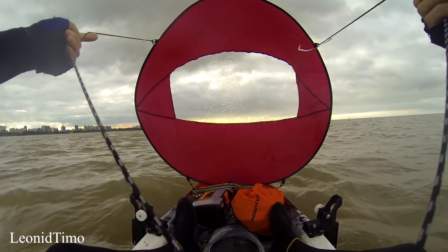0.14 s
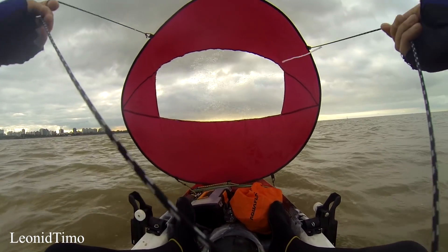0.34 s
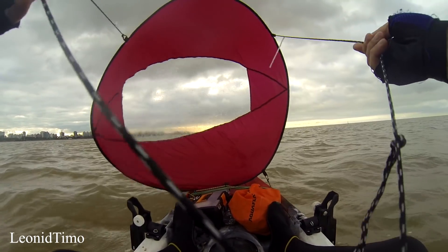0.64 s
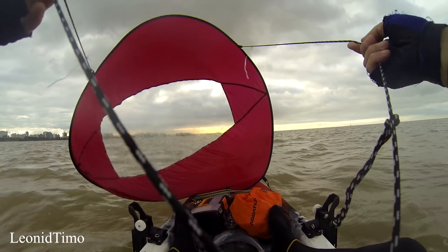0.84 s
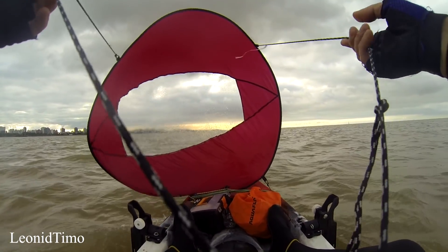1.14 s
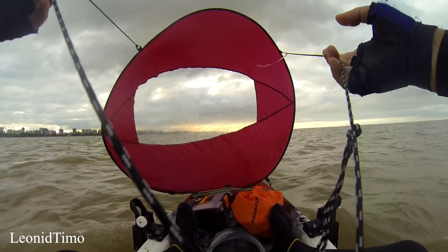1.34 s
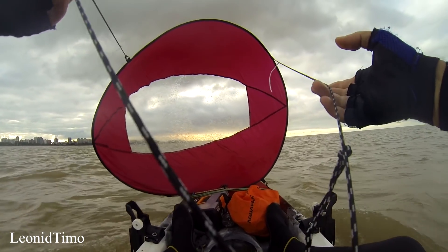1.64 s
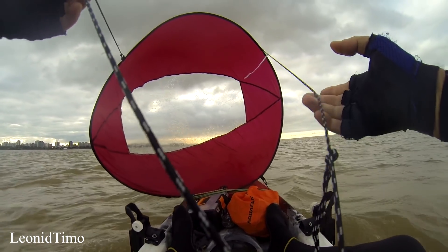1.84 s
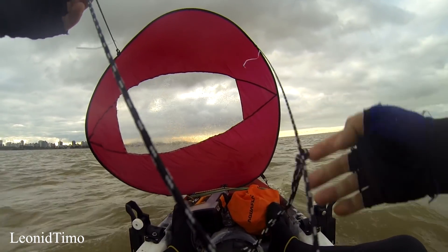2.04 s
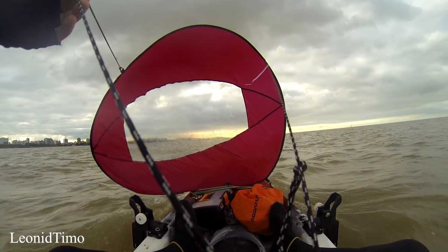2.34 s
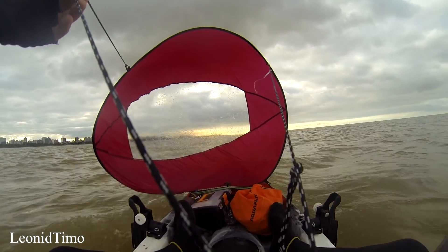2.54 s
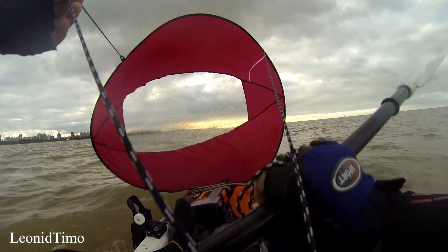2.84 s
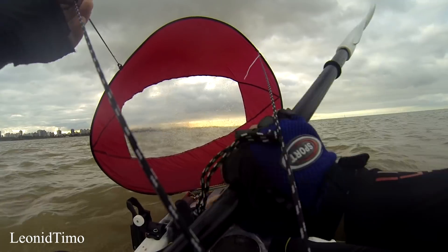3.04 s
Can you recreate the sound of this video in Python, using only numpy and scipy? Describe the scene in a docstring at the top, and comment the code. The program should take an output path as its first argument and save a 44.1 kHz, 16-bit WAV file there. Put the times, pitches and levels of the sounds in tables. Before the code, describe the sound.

Water washes and gurgles along a small boat's hull, with low wind rumble and paddle knocks

```python
"""Wind rumbles on a cased microphone on board a small sailing kayak running through choppy water.
Waves wash along the hull: flickering noise bands, with swarms of short sines as froth and spray.
Close by, single bubbles, drops and ticks sound low to high, and short noise bursts splash the deck.
The paddle knocks the deck: soft pushes set the modes of the hull ringing."""
import sys
import numpy as np
from scipy import signal
from scipy.io import wavfile

SR = 44100
rng = np.random.default_rng(int(sys.argv[2]) if len(sys.argv) > 2 else 0)


def wav_out(sig):
    """Save sig, one row per channel (or a flat mono array), as 16-bit PCM at SR to the path in sys.argv[1]."""
    wavfile.write(sys.argv[1], SR, np.round(np.clip(np.atleast_2d(sig).T, -1, 1) * 32767).astype(np.int16))


N = 141120  # length in samples


def amp(db):
    """Decibels to amplitude factor."""
    return 10 ** (np.asarray(db) / 20)


def rms_one(x):
    """Scale a signal to an rms of 1."""
    return x / np.sqrt(np.mean(x ** 2) + 1e-20)


def in_time(rows):
    """Draw each column as straight lines over time, one value a sample."""
    times, *columns = np.transpose(rows)
    return [np.interp(np.arange(N) / SR, times, column) for column in columns]


def at_hz(spectrum, hz):
    """Read a spectrum's level in dB, along straight lines over log frequency."""
    points_hz, points_db = np.array(spectrum).T
    return np.interp(np.log(hz), np.log(points_hz), points_db)


def add(out, start_s, sound):
    """Mix a sound in at its start time, cut at the end of the scene."""
    i = int(start_s * SR)
    out[i:i + len(sound)] += sound[:max(len(out) - i, 0)]


def drift(rate_hz):
    """Slow chance of spread 1: noise through a two-pole low-pass with its poles at rate_hz."""
    step = 40  # samples between the computed points
    pole = np.exp(-2 * np.pi * rate_hz * step / SR)
    white = rng.standard_normal(N // step + 2002)
    slow = signal.lfilter([1], [1, -2 * pole, pole * pole], white)[2000:]  # settled part
    return np.interp(np.arange(N) / step, np.arange(len(slow)), rms_one(slow))


def banded_noise(spectrum, shared_db, own_db, rate_hz):
    """Third-octave bands of noise that flicker together and alone; rms 1."""
    low, high = spectrum[0][0], min(spectrum[-1][0], 17000)
    edges = np.geomspace(low, high, int(3 * np.log2(high / low)) + 1)
    together = drift(rate_hz)
    white = rng.standard_normal((2, N + SR // 2))  # neighbouring bands use different noise
    out = 0
    for k, (a, b) in enumerate(zip(edges, edges[1:])):
        sos = signal.butter(2, [a, b], "band", fs=SR, output="sos")
        band = signal.sosfilt(sos, white[k % 2])[-N:]
        band_db = at_hz(spectrum, np.sqrt(a * b)) + shared_db * together + own_db * drift(rate_hz)
        out = out + band * amp(band_db)
    return rms_one(out)


def wind():
    """Lumpy wind rumble on the microphone case, its colour nearly steady."""
    # wind buffeting: t/s, level/dB
    buffeting = [(0, -34.5), (.11, -39), (.22, -34), (.45, -36), (.6, -34), (.8, -34), (.92, -38),
                 (1.12, -37), (1.33, -36.5), (1.47, -31), (1.75, -38), (1.96, -32), (2.05, -36.5),
                 (2.18, -24), (2.3, -33), (2.45, -38.5), (2.55, -29.5), (2.65, -29), (2.78, -29),
                 (2.95, -29.5), (3.06, -29), (3.11, -34.5), (3.2, -20.5)]
    # colour of the rumble: f/Hz, relative level/dB per Hz
    wind_colour = [(8.8, -24), (15, 2.5), (27, -0.5), (44, -3.5), (110, -13.5), (227, -25.5), (350, -32),
                   (460, -34.5), (770, -35.5)]
    edge_hz, upper_slope, pivot_db = 28, 0.043, -42  # upper part gains 0.043 dB per dB above pivot
    level_db, = in_time(buffeting)
    rumble = banded_noise(wind_colour, shared_db=1.0, own_db=1.0, rate_hz=9.9)
    deep = signal.sosfiltfilt(signal.butter(1, edge_hz, fs=SR, output="sos"), rumble)
    upper = rumble - deep
    return amp(level_db) * (deep + amp(upper_slope * (level_db - pivot_db)) * upper)


def knocks():
    """A soft push of a few milliseconds sets the modes of the hull ringing."""
    # paddle knocks, before hull and case: t/s, level/dB, contact/s, direction (+1 or -1)
    knock_rows = [(0.5935, -28, 0.0032, 1), (2.682, -21, 0.011, 1), (2.8195, -9, 0.0076, -1),
                  (3.132, -9, 0.0029, 1), (3.1351, -11.5, 0.0034, -1), (3.142, -24, 0.0038, 1),
                  (3.151, -20, 0.0021, -1), (3.158, -24.5, 0.0028, -1)]
    # hull modes: f/Hz, relative level/dB, t60/s
    hull_modes = [(75, -2, 0.059), (120, -5, 0.04), (168, 2.5, 0.021), (226.2, -12, 0.3), (278, -9, 0.11),
                  (356, -22.5, 0.09), (476, -16, 0.094), (780, -19, .04)]
    out, t = np.zeros(N), np.arange(SR // 3) / SR
    ringing = sum(amp(db - 60 * t / t60) * np.cos(2 * np.pi * hz * t) for hz, db, t60 in hull_modes)
    for start_s, db, contact_s, direction in knock_rows:
        push = np.sin(np.pi * np.arange(0, contact_s, 1 / SR) / contact_s) ** 2
        push = push / push.sum()
        add(out, start_s, np.sign(direction) * amp(db) * np.convolve(ringing, push))
    return out


def splashes():
    """Water landing on the deck: band-limited noise that swells suddenly and dies fast."""
    # splashes, levels before envelope, band and case: t/s, level/dB, low f/Hz, high f/Hz, t60/s
    splash_rows = [(0.199, -44, 4360, 10300, 0.027), (0.3885, -28, 855, 15000, 0.024),
                   (.625, -34.5, 200, 3320, 0.021), (1.211, -36.5, 2630, 5360, 0.077),
                   (1.29, -35, 1300, 3960, 0.027), (1.346, -37, 1970, 4970, 0.026),
                   (1.3911, -31, 244, 1380, 0.14), (1.39, -35.5, 2700, 5400, 0.056),
                   (1.401, -38.5, 1980, 5460, 0.055), (1.534, -33.5, 1190, 5290, 0.036),
                   (1.544, -40, 8000, 14500, 0.026), (2.272, -35.5, 990, 3800, 0.054),
                   (2.286, -33, 6000, 10000, 0.018), (2.324, -37, 4000, 10200, 0.061),
                   (2.427, -33, 1500, 3960, 0.021), (2.488, -30, 1490, 11200, 0.038),
                   (2.515, -40, 3960, 8850, 0.02), (2.576, -40, 3480, 8000, 0.018),
                   (2.981, -38, 1650, 8900, 0.049), (2.999, -37, 1510, 3500, 0.049),
                   (3.129, -32.5, 296, 1520, 0.071), (3.135, -25.5, 2230, 10400, 0.023)]
    rise_share = 0.04  # swelling time as a share of t60
    out, t = np.zeros(N), np.arange(SR // 4) / SR
    noises = rng.standard_normal((len(splash_rows), len(t)))
    for (start_s, db, low, high, t60), noise in zip(splash_rows, noises):
        swell = np.minimum(1, 0.045 + t / (rise_share * t60))
        burst = noise * amp(db - 60 * t / t60) * swell
        sos = signal.butter(3, [low, min(high, 19000)], "band", fs=SR, output="sos")
        width_gain = np.sqrt(SR / 2 / (high - low))  # makes up for the power outside the band
        add(out, start_s, signal.sosfilt(sos, burst) * width_gain)
    return out


def play_bubbles(rows):
    """Each bubble swells within a cycle or two and dies as a gliding, wavering, fluttering sine."""
    wobble_octaves, wobble_s = 0.073, 0.00402  # pitch unrest, and how long it holds
    flutter_db, flutter_cycles = 2.2, 1.6  # random level unrest, roughening the tone
    swell_cycles = 0.9  # time constant of the onset
    out, unrest = np.zeros(N), rng.standard_normal(4096)
    places = np.arange(len(unrest))
    for start_s, db, hz, t60, rise_octaves in rows:
        t = np.arange(int(max(t60, .001) * SR)) / SR
        # the start time picks each bubble's place in the shared unrest
        wander = np.interp(start_s * 1000 + t / wobble_s, places, unrest)
        pitch_hz = hz * 2 ** (rise_octaves * t / t60 + wobble_octaves * wander)
        phase = 2 * np.pi * np.cumsum(pitch_hz) / SR
        flutter = np.interp(start_s * 1000 % 3000 + t * hz / flutter_cycles, places, unrest[::-1])
        level = amp(db - 60 * t / t60 + flutter_db * flutter)
        swell = 1 - np.exp(-t * hz / swell_cycles)
        add(out, start_s, level * swell * np.sin(phase))
    return out


def single_bubbles():
    """Single bubbles, drops and ticks, low to high, each a decaying sine of its own pitch."""
    # bubbles, before swell, unrest and case: t/s, level/dB, start f/Hz, t60/s, rise/octaves over t60
    bubble_rows = [(.617, -45, 1650, .03, .2), (.6255, -37.5, 2920, 0.012, 0.5),
                   (.628, -29, 500, 0.036, 1.9), (1.212, -31.5, 4000, 0.016, 0),
                   (1.217, -38, 456, 0.12, 0.5), (1.247, -37, 1024, 0.11, 4.5),
                   (1.318, -31, 2460, 0.018, 0.9), (1.33, -38, 456, 0.061, -7.5),
                   (1.345, -35.5, 3400, 0.022, -1), (1.394, -26.5, 296, 0.22, -.3),
                   (1.392, -22.5, 437, 0.065, -0.5), (1.39, -28.5, 957, 0.054, -2.2),
                   (1.401, -37, 766, .06, -1.5), (1.512, -29.5, 231, 0.15, -0.1),
                   (1.512, -36.5, 1010, 0.11, 0.5), (1.539, -42, 4850, 0.026, 0.3),
                   (1.598, -28, 453, 0.066, 0.4), (1.6, -34.5, 198, 0.29, 0.2),
                   (1.696, -31.5, 1530, 0.02, 1.5), (1.741, -40, 4400, 0.024, 0),
                   (1.754, -25, 279.8, 0.21, 1.45), (1.81, -34, 281, 0.19, 0.99),
                   (1.855, -37, 1810, 0.05, -0.21), (1.971, -36, 1175, 0.083, -0.3),
                   (2.042, -39, 9500, 0.013, -1), (2.053, -31.5, 9100, 0.012, 0),
                   (2.233, -29.5, 8900, 0.013, -0.5), (2.274, -41, 1023, .07, 1),
                   (2.352, -31, 260, 0.15, 2.7), (2.362, -34, 1930, 0.06, -1.2), (2.4, -29, 234, 0.16, 3.7),
                   (2.401, -38.5, 900, 0.13, 0.6), (2.416, -38, 5320, 0.14, 0.8),
                   (2.43, -23.5, 9040, 0.0089, -0.15), (2.432, -38, 5900, 0.083, -0.5),
                   (2.471, -15.5, 221, 0.084, -0.55), (2.488, -45, 4260, 0.034, 3.5),
                   (2.506, -24, 240.5, 0.13, 3.5), (2.33, -39.5, 449, .12, -0.5),
                   (2.565, -34.5, 826, 0.07, 2), (2.602, -22, 8300, 0.011, 0.4),
                   (2.61, -36, 369, 0.16, 2.5), (2.735, -36, 474, 0.098, 0),
                   (3.102, -41.5, 2020, 0.064, 0.5)]
    return play_bubbles(bubble_rows)


def swarm(per_s, vigour_db, spectrum, low_hz, high_hz, t60_cycles, top_rise, spread_db):
    """Random bubbles spread in log pitch, denser as the wave rises, a few much louder; rms 1."""
    crest_db, thinning = -45, 1.1  # below the crest the grains thin out, in dB per dB
    clump_db, clump_hz = 6, 15  # grains come in bunches
    draws = rng.random((4000, 5))[:int(np.clip(per_s * N / SR, 1, 4000))]
    chance = amp(thinning * (vigour_db - crest_db) + clump_db * (drift(clump_hz) - 1))
    born = draws[:, -1] < chance[(draws[:, 0] * N).astype(int)]
    place, pitch, size, vary, _ = draws[born].T
    hz = low_hz * (high_hz / low_hz) ** pitch
    size_db = -spread_db * np.log(np.maximum(size, .06))
    db = at_hz(spectrum, hz) + 10 * np.log10(hz) + size_db
    t60 = t60_cycles * (.5 + vary) / hz
    return rms_one(play_bubbles(zip(place * N / SR, db, hz, t60, top_rise * vary ** 2)))


def wash():
    """Waves rushing along the hull: smooth noise with bubbling froth below and spray above."""
    # the waves on the hull, before the shares below: t/s, body level/dB, hiss level/dB
    wave_levels = [(0, -55, -63), (.3, -54.5, -56.5), (.55, -54.5, -54), (.66, -51, -59), (.72, -53.5, -51),
                   (.85, -52.5, -50.5), (.92, -51.5, -62), (.98, -51.5, -52.5), (1.06, -51, -51.5),
                   (1.15, -46, -52), (1.3, -43.5, -49.5), (1.38, -43.5, -46), (1.45, -43.5, -50),
                   (1.53, -43.5, -45.5), (1.6, -45.5, -55), (1.9, -47.5, -53.5), (2.02, -48.5, -54.5),
                   (2.12, -48.5, -51), (2.28, -43.5, -46.5), (2.4, -41.5, -48), (2.49, -41, -43.5),
                   (2.58, -46, -55.5), (2.66, -51, -53), (2.94, -56, -53.5), (3.02, -53.5, -51),
                   (3.11, -54, -52.5), (3.16, -45.5, -51.5), (3.2, -59, -46.5)]
    # colour of the body and froth: f/Hz, relative level/dB per Hz
    body_colour = [(88, -43), (150, -30), (200, -6.5), (298, -2.5), (454, -2), (640, -12), (850, -3.5),
                   (1050, -5), (1360, -10), (2270, -15), (3500, -21.5), (4550, -27), (7700, -120)]
    # colour of the hiss and spray: f/Hz, relative level/dB per Hz
    hiss_colour = [(1180, 7), (2000, -2.5), (3020, -1.5), (4240, -1), (5930, -3), (7200, -4.5),
                   (8530, -2.5), (15000, -28.5)]
    body_share_db, froth_share_db, hiss_share_db, spray_share_db = -1, -1, -2, -5.5
    body_db, hiss_db = in_time(wave_levels)
    body = banded_noise(body_colour, shared_db=1.0, own_db=0.5, rate_hz=16.0)
    # per_s counts the candidates; t60_cycles is the mean, top_rise the largest in octaves
    froth = swarm(900, body_db, body_colour, low_hz=194.8, high_hz=3324,
                  t60_cycles=23.49, top_rise=0.812, spread_db=2.75)
    hiss = banded_noise(hiss_colour, shared_db=1.5, own_db=1.24, rate_hz=17.0)
    spray = swarm(1200, body_db, hiss_colour, low_hz=1946, high_hz=10200,
                  t60_cycles=33, top_rise=0.236, spread_db=1.4)
    lower = amp(body_share_db) * body + amp(froth_share_db) * froth
    upper = amp(hiss_share_db) * hiss + amp(spray_share_db) * spray
    return amp(body_db) * lower + amp(hiss_db) * upper


def scene():
    """Wind and wash, with the close sounds dulled by the microphone case."""
    case_cut_hz = 7800
    near = knocks() + splashes() + single_bubbles()
    near = signal.sosfilt(signal.butter(3, case_cut_hz, fs=SR, output="sos"), near)
    return (wind() + near + wash())[None]


def record(dry):
    """A steep low-pass cuts the top, 60 dB down from 15410 Hz upward."""
    return signal.sosfilt(signal.cheby2(14, 60, 15410, fs=SR, output="sos"), dry)


dry = scene()
out = record(dry)
wav_out(out)
```